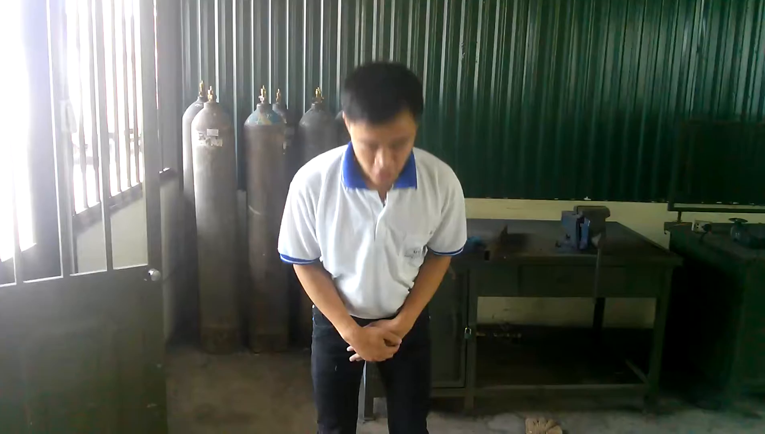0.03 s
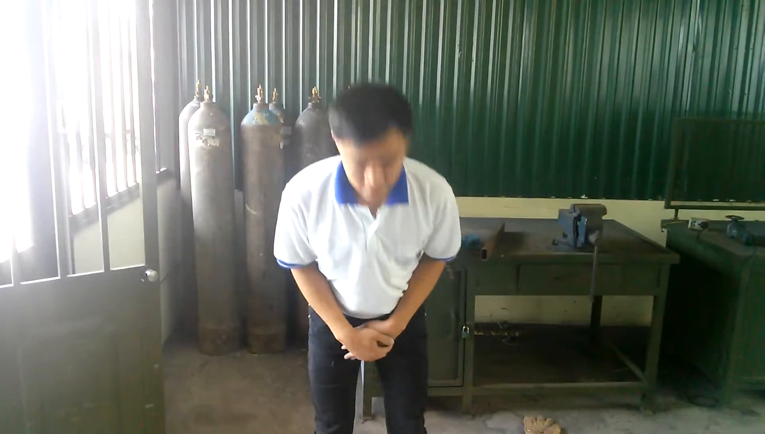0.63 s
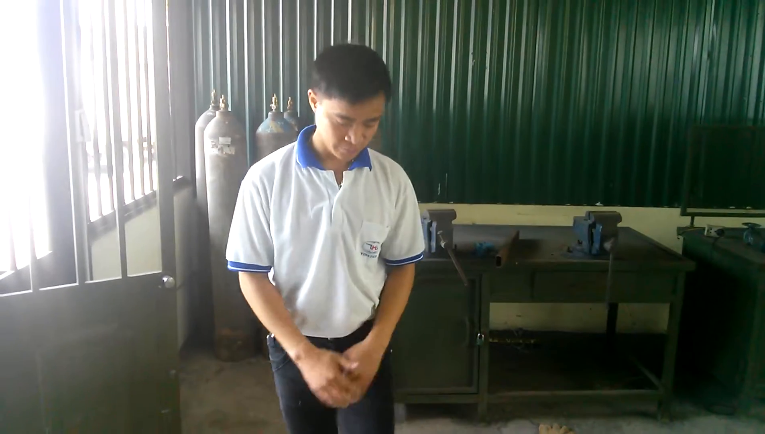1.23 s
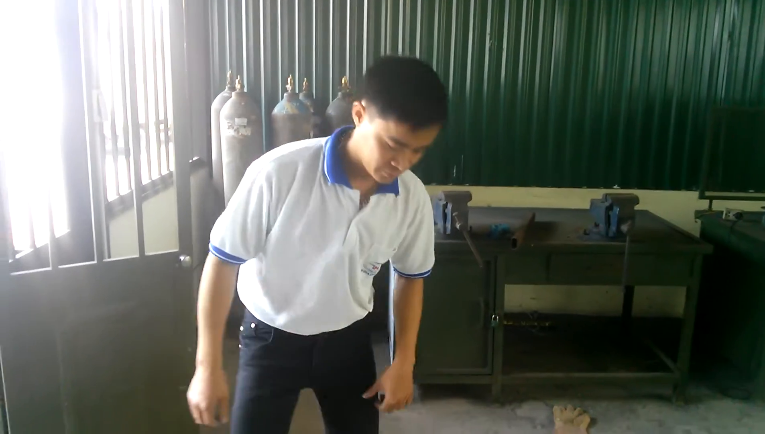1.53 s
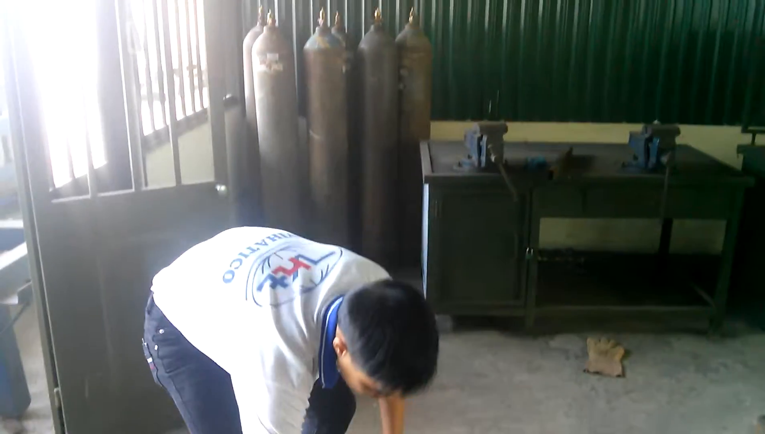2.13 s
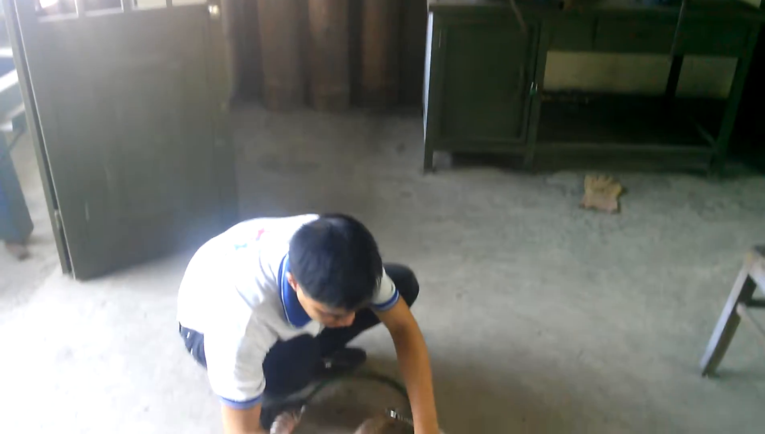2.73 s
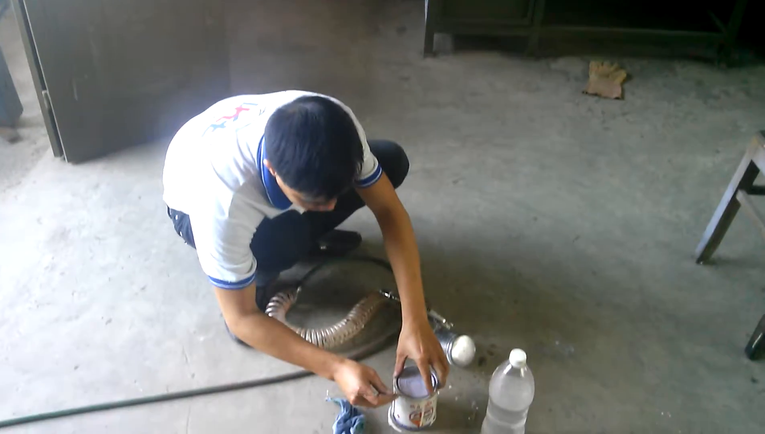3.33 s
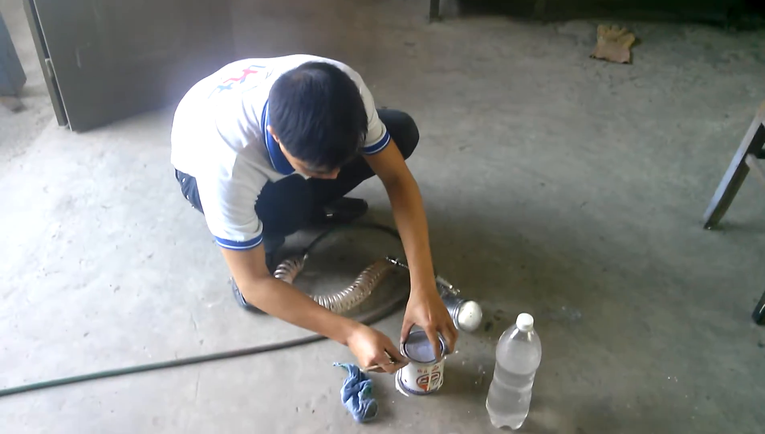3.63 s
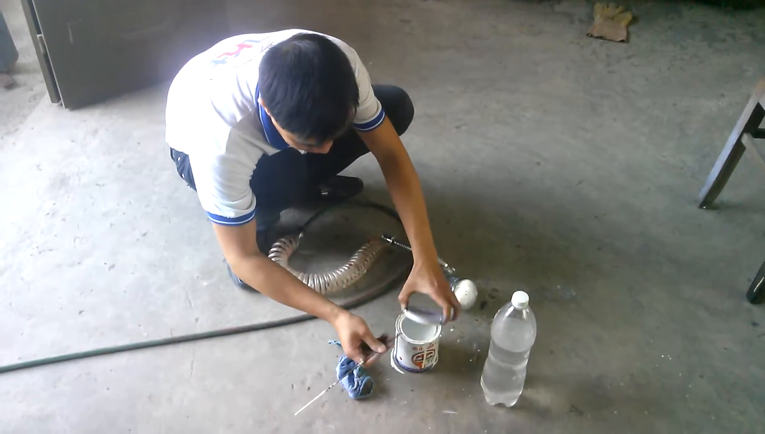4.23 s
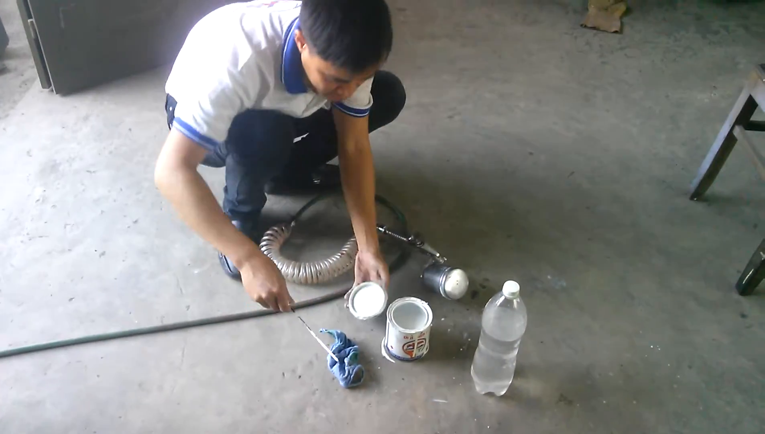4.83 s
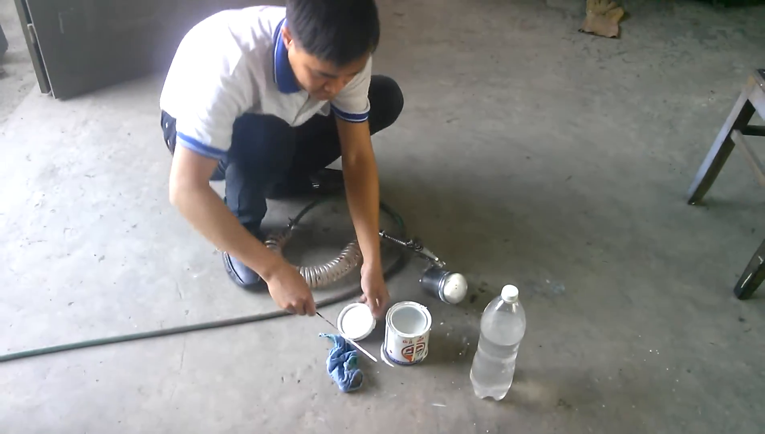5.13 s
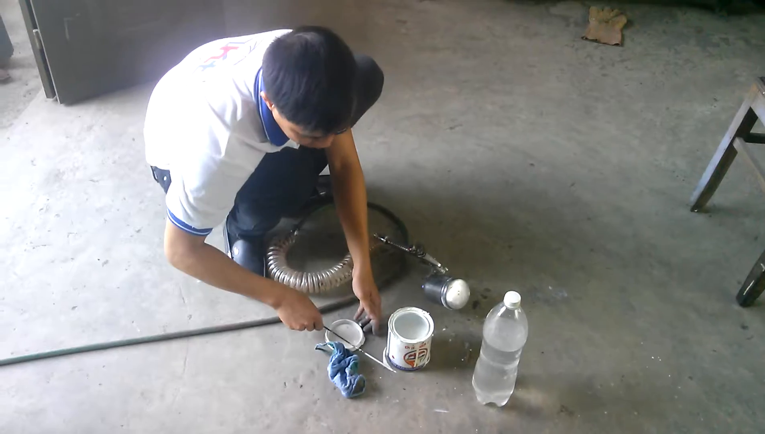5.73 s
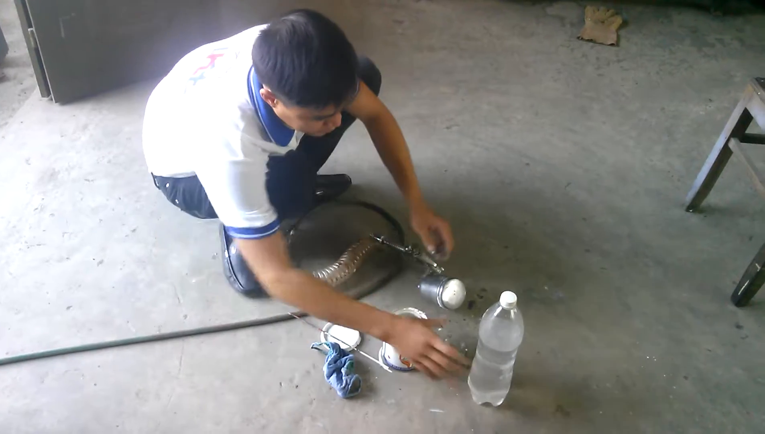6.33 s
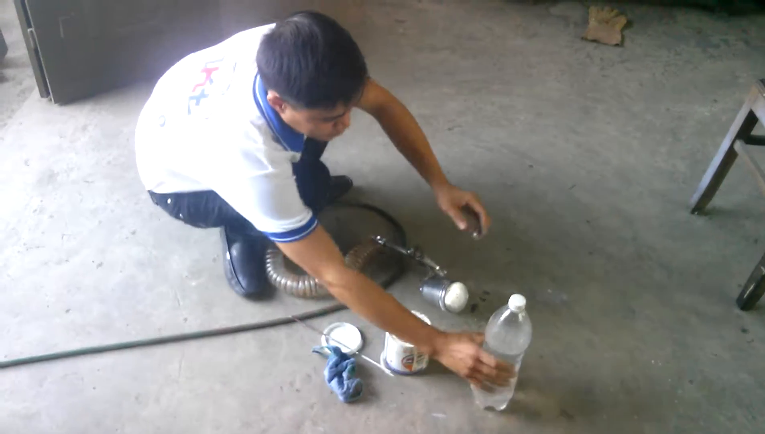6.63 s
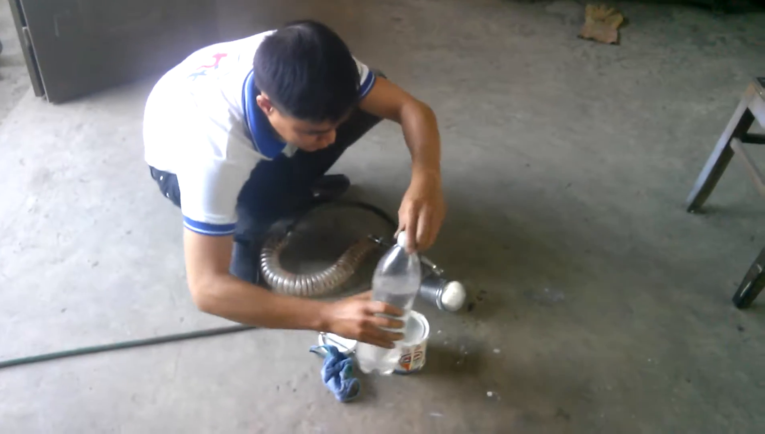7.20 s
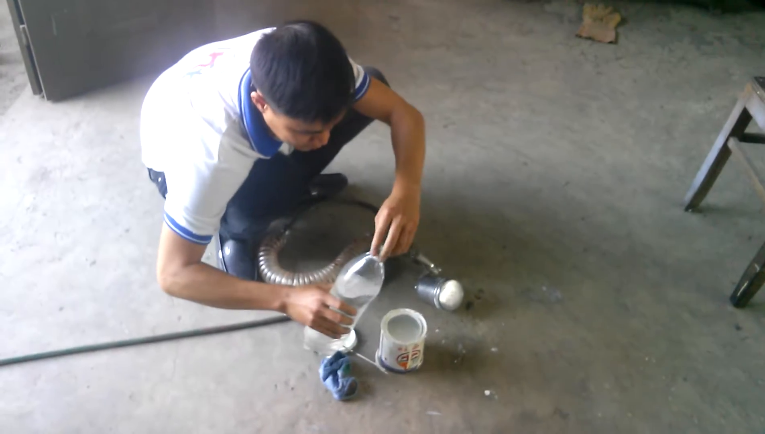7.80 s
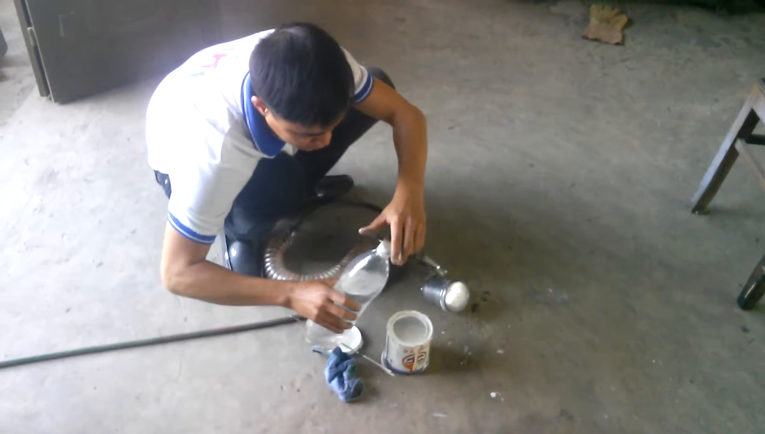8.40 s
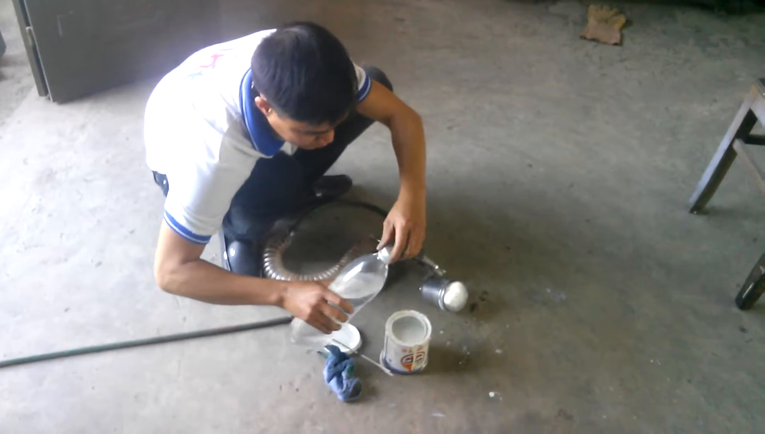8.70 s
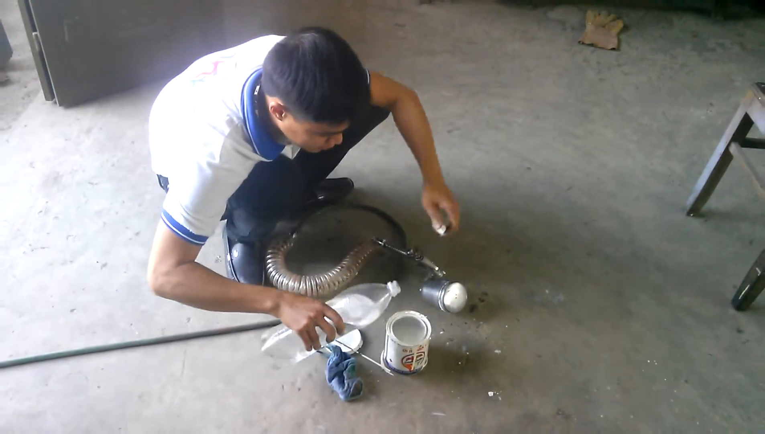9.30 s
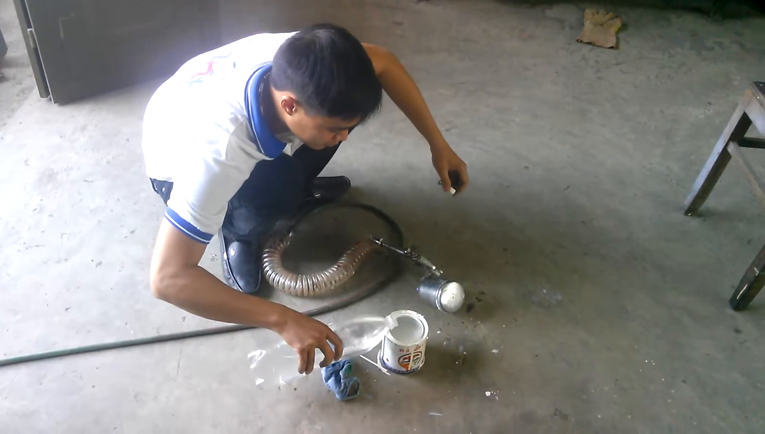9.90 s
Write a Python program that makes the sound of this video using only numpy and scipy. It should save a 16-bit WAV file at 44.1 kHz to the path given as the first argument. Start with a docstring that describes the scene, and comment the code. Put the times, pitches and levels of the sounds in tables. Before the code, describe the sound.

Gritty footsteps, then a thin metal lid clattering and scraping on the floor, followed by the soft crackle of a handled plastic bottle.

```python
"""After a silent moment, a low rumble and rustling clothes fill a sheet-metal workshop; steel rings
faintly. A man steps forward and squats, his shoes scuffing the gritty concrete. He drops the lid of a tin
can, drags it and knocks it against a tool: the thin metal clanks loudly, and a thin, high ring lingers.
Then a plastic bottle crackles in his hands. The hall echoes shoes, lid and bottle, and a noise suppressor
turns the quiet moments down unsteadily."""
import sys
import numpy as np
from scipy import signal
from scipy.fft import rfft, irfft
from scipy.io import wavfile
from scipy.ndimage import uniform_filter1d

SR = 44100
rng = np.random.default_rng(int(sys.argv[2]) if len(sys.argv) > 2 else 0)


def wav_out(sig):
    """Save sig, one row per channel (or a flat mono array), as 16-bit PCM at SR to the path in sys.argv[1]."""
    wavfile.write(sys.argv[1], SR, np.round(np.clip(np.atleast_2d(sig).T, -1, 1) * 32767).astype(np.int16))


N = 438794
TIME = np.arange(N) / SR
EVENT_TIME = TIME[:2 * SR]  # clock for one short sound

# tone of the hall's rumble: (frequency [Hz], relative level [dB])
RUMBLE_SPECTRUM = [(15, -38), (25, -39.5), (48, 1.5), (80, -3.5), (102, 1), (139, -6), (179, -3.5),
                   (295, -9.5), (430, -9), (537, -15.5), (615, -16.5), (1010, -24), (1500, -37.5),
                   (1950, -65), (3300, -120)]
# tone of rustling cloth: (frequency [Hz], relative level [dB])
RUSTLE_SPECTRUM = [(400, -28.5), (700, 0.5), (1200, -1.5), (2400, -4), (3100, -8), (4400, -4), (5500, -10),
                   (6800, -12), (9000, -15.5), (13000, -28.5)]
# body movements that rustle the clothes: (middle time [s], length [s], level [dB])
BODY_MOVES = [(1.05, .34, -45.5), (1.587, 0.65, -47.5), (2.6, 0.38, -48), (3.25, 0.42, -42),
              (4.867, 0.32, -46.5), (7.757, 0.28, -50.5), (8.9, 0.98, -50.5), (9.89, 0.83, -47.5)]
# faint metal tones: the first five are rubbed steel; the last two are the thin, high ring of the lid
# or can that lingers after the rim blow. A fade time, or t60, is how long a sound takes to fall by 60 dB.
# (time [s], pitch [Hz], level [dB], held length [s], fade time [s], jerkiness [0-1])
FAINT_RINGS = [(.79, 1297, -53, .38, .12, 1), (.862, 1297, -45, .05, .15, 1),
               (3.1, 1303, -52, .36, .15, .7), (3.09, 3332, -52, .4, .8, .5), (3.1, 5060, -57, .3, .5, .5),
               (5.7, 7310, -55, 1.08, .15, 0), (5.7, 8780, -56, 1.08, .15, 0)]

# basic tone of all scraping and crackling: (frequency [Hz], relative level [dB])
FRICTION_SPECTRUM = [(250, -18), (600, 11), (1400, 8), (2400, 8.5), (3200, 9), (5000, 8.5), (7000, 0.5),
                     (9500, 0.5), (14000, -23)]
# heels and soft knocks on the floor: (time [s], level [dB])
FLOOR_THUDS = [(1.358, -37), (1.412, -36), (2.162, -40), (3.087, -35.5), (3.177, -31.5), (3.222, -31.5),
               (3.262, -40)]
# tone of such a knock: (frequency [Hz], relative level [dB])
THUD_SPECTRUM = [(150, -39), (400, -9), (700, 1), (1000, 0.5), (1400, -37), (2500, -35), (6000, -23),
                 (10000, -52)]
# soles slide on gritty concrete: (time [s], level [dB], fade time [s], centre frequency [Hz])
SOLE_SCUFFS = [(1.362, -42.5, 0.36, 3300), (1.44, -42.5, 0.42, 3000), (1.865, -38.5, .5, 3500),
               (2.165, -38, 0.16, 3850), (2.311, -40.5, 0.35, 3300), (2.438, -33.5, 0.12, 3700),
               (2.509, -37, 0.064, 3500), (2.696, -32, 0.23, 5100), (2.775, -40, 0.18, 3400),
               (3.426, -39.5, 0.11, 6000)]
# sand cracks under a sole: (time [s], level [dB])
SAND_CRUNCHES = [(1.357, -33.5), (2.163, -42), (2.695, -29.5), (2.761, -28)]
# a sole sticks and chirps: (time [s], level [dB], centre frequency [Hz])
SOLE_CHIRPS = [(1.897, -45, 3000), (2.561, -39.5, 4120), (2.825, -30, 7060), (2.97, -42.5, 6600),
               (3.985, -49.5, 5600)]
# hands squeeze the bottle and twist its cap: (time [s], level [dB], fade time [s], centre frequency [Hz])
BOTTLE_SQUEEZES = [(7.054, -44, 0.19, 2630), (7.426, -43.5, 0.73, 5500), (7.659, -47.5, 0.65, 2800),
                   (7.926, -37, 0.4, 2370), (8.0, -40, 0.56, 2200), (8.212, -45.5, 0.24, 2800),
                   (8.304, -37, 0.44, 2700), (8.649, -39, 0.5, 2300), (9.649, -47, 0.48, 4500)]
# the bottle's wall snaps: (time [s], level [dB])
BOTTLE_SNAPS = [(7.433, -48), (7.629, -36.5), (7.941, -34), (8.189, -31.5), (8.59, -36.5), (8.633, -35.5)]

# the lid's modes, the tones it rings at, with a relative level for each kind of contact:
# (pitch [Hz], fade time [s], landing flat [dB], struck on the rim [dB], settling [dB])
LID_MODES = [(954, .4, -13, -27, -18), (990, .45, -6, -22, -24), (1347, .45, -9, -30, -16),
             (1568, .5, -12, -21, -10), (1702, .4, -7, -20, -18), (1763, .55, -6, -8, -5),
             (1808, .75, -2, 0, 1), (1829, .6, 0, -5, -6), (1900, .4, -24, -15, -15),
             (2082, .4, -16, -16, -13), (2171, .5, -13, -16, -13), (2314, .55, -12, -16, -3),
             (2538, .6, -3, -27, -26), (2751, .6, -12, -4, -5), (2766, .5, -10, -12, -16),
             (3059, .65, -30, -9, -6), (3186, .5, -9, -14, -7), (3610, .3, -18, -14, -13),
             (3930, .4, -10, -18, -24), (4124, .45, -10, -24, -10), (4152, .45, -8, -26, -24),
             (4272, .42, -14, -6, -10), (4397, .45, -28, -14, -24), (4961, .33, -20, -4, -16),
             (5252, .38, -11, -9, -13), (5555, .4, -22, -15, -26)]
# the lid's many weak modes when it lands flat: (frequency [Hz], relative level [dB])
FLAT_WASH_SPECTRUM = [(300, -43), (700, -46), (980, -10.5), (1130, -55), (1750, 11.5), (2000, -17),
                      (2600, 2.5), (3400, -18), (3700, 6.5), (4300, 8), (4650, -2.5), (5300, -11),
                      (6800, -9), (12000, -19)]
# the same when it is struck on the rim or settles: (frequency [Hz], relative level [dB])
RIM_WASH_SPECTRUM = [(300, -63), (800, -29.5), (1200, -17.5), (1800, 4.5), (2450, -4), (2850, -4.5),
                     (3800, 0.5), (4350, -4), (4700, -4.5), (5200, -4), (5800, -2.5), (6500, -5.5),
                     (7500, -8), (12000, -18)]
# the lid's highest tones: (pitch [Hz], relative level [dB])
SHIMMER_MODES = [(10648, -14.5), (11741, -4.5), (12586, -14.5), (13150, -9), (14190, 5)]
# the lid slides on concrete:
# (time [s], length [s], hiss level [dB], fall of the hiss [dB/s], ring level at the end [dB])
LID_DRAGS = [(4.95, .19, -32.5, 112, -41), (5.451, 0.3, -31, 46, -21.5)]
# blows on the lid:
# (time [s], ring level [dB], chatter level [dB], crack level [dB], crack fade time [s], kind of contact)
LID_BLOWS = [(5.1454, -19, -17.5, -2.5, 0.036, "flat"), (5.2107, -15, -20, -12, 0.055, "flat"),
             (5.629, -27, -37, -25, 0.053, "flat"), (5.7, -16.5, -16, -6.5, 0.15, "rim"),
             (6.031, -27.5, -23, -18, 0.078, "settle"), (6.089, -45, -40, -20, 0.12, "settle")]

# how the microphone dulls the treble: (frequency [Hz], gain [dB])
MICROPHONE_RESPONSE = [(6000, 0), (7000, -2), (7400, -11.5), (7900, -21), (8700, -14.5), (9600, -18.5),
                       (10400, -41), (12000, -38), (16000, -51)]


def undb(db):
    """Turn decibels into a factor to multiply by."""
    return 10 ** (np.asarray(db) / 20)


def unit(x):
    """Scale x to an average strength (rms) of 1."""
    return x / np.sqrt(np.mean(x ** 2))


def fade(t60):
    """A smooth fall from 1 that is 60 dB down after t60 seconds."""
    return np.exp(-np.log(1000) * EVENT_TIME / t60)


def add(out, start, x):
    """Mix x into out at a start time in seconds."""
    i = int(start * SR)
    out[i:i + len(x)] += x[:N - i]


def colour(x, spectrum):
    """Shape the tone of x with (frequency [Hz], level [dB]) points, then scale it to strength 1."""
    hz, db = np.transpose(spectrum)
    freqs = np.maximum(np.fft.rfftfreq(len(x), 1 / SR), 1)
    gain = undb(np.interp(np.log(freqs), np.log(hz), db))
    return unit(irfft(rfft(x) * gain, len(x)))


def grains(size, spread_db):
    """A dense stream of tiny hits; more spread makes them more unequal and crackly."""
    return rng.standard_normal(size) * undb(spread_db * np.minimum(rng.exponential(size=size), 8))


def wander(rate_hz):
    """A random curve of strength 1 that glides to a new value rate_hz times a second."""
    step = int(SR / rate_hz)
    stairs = np.repeat(rng.standard_normal(N // step + 1), step)
    return unit(uniform_filter1d(stairs, step)[:N])


def ring(hz, db, t60):
    """One mode: a pure tone that dies away."""
    return undb(db) * fade(t60) * np.sin(2 * np.pi * hz * EVENT_TIME)


def rumble_and_clothes(rumble_db=-39.5, resting_rustle_db=-49, waver_db=0.88):
    """The hall rumbles and clothes rustle, swelling with each move; both waver together."""
    swells = sum(undb(db) * np.exp(-8 * ((TIME - middle) / length) ** 2)
                 for middle, length, db in BODY_MOVES)
    rumble = colour(rng.standard_normal(N), RUMBLE_SPECTRUM) * undb(rumble_db)
    cloth = colour(grains(N, spread_db=3.0), RUSTLE_SPECTRUM)
    rustle = cloth * np.hypot(undb(resting_rustle_db), swells)
    return (rumble + rustle) * undb(waver_db * wander(rate_hz=35))


def hall_echo(x, echo_db=-5, low_t60=0.77, high_t60=0.34, split_hz=3500, build_s=0.016):
    """The metal walls throw back a blurred echo that builds up quickly and loses its treble first."""
    noise = rng.standard_normal(len(EVENT_TIME))
    low = signal.sosfilt(signal.butter(2, split_hz, fs=SR, output="sos"), noise)
    high = signal.sosfilt(signal.butter(2, split_hz, "high", fs=SR, output="sos"), noise)
    build_up = 1 - np.exp(-(EVENT_TIME / build_s) ** 2)
    tail = (low * fade(low_t60) - high * fade(high_t60)) * build_up
    return undb(echo_db) * signal.fftconvolve(x, tail / np.linalg.norm(tail))[:N]


def faint_metal_rings(stroke_s=0.077):
    """Fluttering tones: steel rubbed in jerky strokes, and the lid or can ringing on after the rim blow."""
    out = np.zeros(N)
    pauses = np.cos(np.pi * EVENT_TIME / stroke_s) ** 2
    for start, hz, db, length, t60, jerkiness in FAINT_RINGS:
        drive = rng.standard_normal(len(EVENT_TIME)) * (1 - jerkiness * pauses) * (EVENT_TIME < length)
        tone = signal.fftconvolve(drive, ring(hz, 0, t60))
        strength = np.sqrt(np.sum(tone ** 2) / (length * SR))
        add(out, start, undb(db) * tone / strength)
    return out


def friction(bursts, spread_db, floor_db=-16):
    """Surfaces catch and slip in tiny steps; each burst swells and fades around its own frequency."""
    out = np.zeros(N)
    friction_hz, friction_db = np.transpose(FRICTION_SPECTRUM)
    hz = np.geomspace(100, 16000, 90)
    surface_db = np.interp(np.log(hz), np.log(friction_hz), friction_db)
    for start, db, rise_s, t60, centre_hz, width_octaves in bursts:
        hump = np.exp(-.5 * (np.log2(hz / centre_hz) / width_octaves) ** 2) + undb(floor_db)
        spectrum = np.column_stack([hz, surface_db + 20 * np.log10(hump)])
        slips = colour(grains(len(EVENT_TIME), spread_db), spectrum)
        swell = np.minimum(EVENT_TIME / rise_s, 1)
        fall = np.interp(EVENT_TIME - rise_s, EVENT_TIME, fade(t60))  # begins once the swell is over
        add(out, start, undb(db) * swell * fall * slips)
    return out


def floor_thuds(t60=0.11):
    """Heels and soft knocks on concrete make dull thuds that die quickly."""
    out = np.zeros(N)
    for start, db in FLOOR_THUDS:
        knock = colour(rng.standard_normal(len(EVENT_TIME)), THUD_SPECTRUM)
        add(out, start, undb(db) * fade(t60) * knock)
    return out


def shoe_soles(rise_share=0.076):
    """Soles slide, crack sand grains, and stick with a chirp; a longer slide builds up more slowly."""
    # each burst: (time [s], level [dB], rise [s], fade time [s], centre frequency [Hz], width [octaves])
    scuffs = [(start, db, rise_share * t60, t60, hz, 1.66) for start, db, t60, hz in SOLE_SCUFFS]
    crunches = [(start, db, 0.0012, 0.06, 2700, 1.4) for start, db in SAND_CRUNCHES]
    chirps = [(start, db, 0.017, 0.12, hz, 0.24) for start, db, hz in SOLE_CHIRPS]
    return friction(scuffs + crunches + chirps, spread_db=2.5)


def plastic_bottle(rise_share=0.069):
    """Thin plastic crackles under each squeeze and now and then snaps."""
    # each burst: (time [s], level [dB], rise [s], fade time [s], centre frequency [Hz], width [octaves])
    squeezes = [(start, db, rise_share * t60, t60, hz, 1.2) for start, db, t60, hz in BOTTLE_SQUEEZES]
    snaps = [(start, db, 0.0024, 0.095, 2270, 0.77) for start, db in BOTTLE_SNAPS]
    return friction(squeezes + snaps, spread_db=3)


def lid_ring(contact):
    """Where the lid is hit sets how loud each strong mode is; neighbouring modes swing opposite ways."""
    column = ("flat", "rim", "settle").index(contact)
    return sum((-1) ** k * ring(hz, db[column], t60) for k, (hz, t60, *db) in enumerate(LID_MODES))


def lid_chatter(contact, smear_t60=0.045, wash_db=-3):
    """Rattling on the floor smears each strong mode into noise; a wash of weak modes fills the gaps."""
    rattle, noise = rng.standard_normal((2, len(EVENT_TIME)))
    short_ring = lid_ring(contact) * fade(smear_t60)
    smeared = unit(irfft(rfft(rattle) * rfft(short_ring), len(rattle)))
    wash = colour(noise, FLAT_WASH_SPECTRUM if contact == "flat" else RIM_WASH_SPECTRUM)
    return unit(smeared + undb(wash_db) * wash)


def lid_shimmer(relative_db=-12, t60=0.43):
    """Every blow also sets the lid's highest tones ringing."""
    out = np.zeros(N)
    high_tones = sum(ring(hz, db, t60) for hz, db in SHIMMER_MODES)
    for start, _, chatter_db, *_ in LID_BLOWS:
        add(out, start, undb(chatter_db + relative_db) * high_tones)
    return out


def lid_drags(push_hz=1750, width_hz=1500, held_t60=0.22, rise_s=0.08, release_s=0.027,
              swell_db_per_s=70.5):
    """Sand grains catch under the sliding lid: they hiss and make it ring, while the hand damps it."""
    catches = grains(N, spread_db=1.0)
    grit = colour(catches, FRICTION_SPECTRUM)
    grit = colour(grit, [(5000, 0), (9000, -4)])  # soften the treble
    push = signal.lfilter(*signal.iirpeak(push_hz, push_hz / width_hz, fs=SR), catches)
    held_ring = (lid_ring("flat") + lid_ring("rim")) * fade(held_t60)
    singing = unit(signal.fftconvolve(push, held_ring)[:N])
    out = np.zeros(N)
    for start, length, hiss_db, fall_db_per_s, end_ring_db in LID_DRAGS:
        age = np.clip(TIME - start, 0, length)
        press = np.minimum(age / rise_s, 1) ** 2
        release = np.exp(-np.maximum(TIME - start - length, 0) / release_s)
        hiss = grit * undb(hiss_db - fall_db_per_s * np.maximum(age - rise_s, 0))
        # the ring swells as the lid tips onto its rim
        ringing = singing * undb(end_ring_db - swell_db_per_s * (length - age))
        out += press * release * (hiss + ringing)
    return out


def lid_clanks(chatter_t60=0.47, rise_s=0.0021):
    """Each blow cracks and chatters, then the lid rings out; returns (noisy clatter, clear rings)."""
    clatter, rings = np.zeros(N), np.zeros(N)
    onset = np.minimum(EVENT_TIME / rise_s, 1)
    for start, ring_db, chatter_db, crack_db, crack_t60, contact in LID_BLOWS:
        chatter = undb(chatter_db) * fade(chatter_t60) * lid_chatter(contact)
        crack = undb(crack_db) * fade(crack_t60) * lid_chatter(contact)
        add(clatter, start, onset * (crack + chatter))
        add(rings, start, onset * undb(ring_db) * lid_ring(contact))
    return clatter, rings


def scene():
    """Lid, shoes and bottle echo over the background; the lid's clear rings get only a little echo."""
    clatter, rings = lid_clanks()
    noises = clatter + lid_drags() + shoe_soles() + floor_thuds() + plastic_bottle()
    echo = hall_echo(noises + undb(-12) * rings)
    return (noises + rings + lid_shimmer() + faint_metal_rings() + echo + rumble_and_clothes())[None]


def suppressor_dips(typical_gap_s=0.15, length_s=0.08, typical_db=7):
    """Brief dips in the suppressor's gain, uneven in spacing and strength; returns their depth in dB."""
    gaps, strengths = rng.uniform(.4, 1.6, (90, 2)).T
    starts = np.cumsum(typical_gap_s * gaps)
    dip = typical_db * np.hanning(int(length_s * SR))
    out = np.zeros(N)
    for start, strength in zip(starts[starts < N / SR], strengths):
        add(out, start, strength * dip)
    return out


def noise_suppressor(x, threshold_db=-37, range_db=13, cut_db=5, window_s=0.025, listen_above_hz=700):
    """While little is heard above the rumble, the suppressor turns everything down, unsteadily."""
    upper = signal.sosfilt(signal.butter(2, listen_above_hz, "high", fs=SR, output="sos"), x)
    power = np.maximum(uniform_filter1d(upper ** 2, int(window_s * SR)), 1e-12)
    quietness = np.clip((threshold_db - 10 * np.log10(power)) / range_db, 0, 1)
    return x * undb(-quietness * (cut_db + suppressor_dips()))


def record(dry, silent_until_s=0.768, clip_level=0.82, top_hz=15500):
    """Suppress noise, silence the opening, clip the loudest peaks, then dull and cut the treble."""
    suppressed = noise_suppressor(dry) * (TIME >= silent_until_s)
    clipped = np.clip(suppressed, -clip_level, clip_level)
    hz, db = np.transpose(MICROPHONE_RESPONSE)
    freqs = np.linspace(0, SR / 2, 257)
    microphone = signal.firwin2(129, freqs, undb(np.interp(freqs, hz, db)), fs=SR)
    dulled = signal.fftconvolve(clipped, microphone[None], "same")
    return signal.sosfilt(signal.ellip(8, .2, 70, top_hz, fs=SR, output="sos"), dulled)


dry = scene()
out = record(dry)
wav_out(out)
```